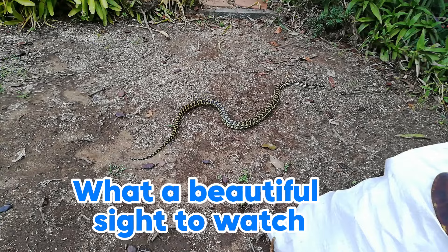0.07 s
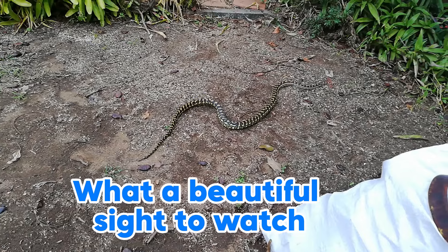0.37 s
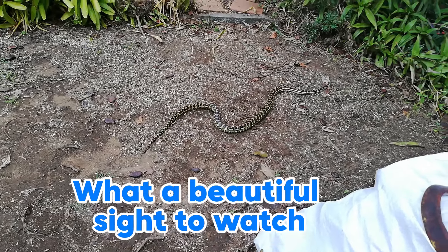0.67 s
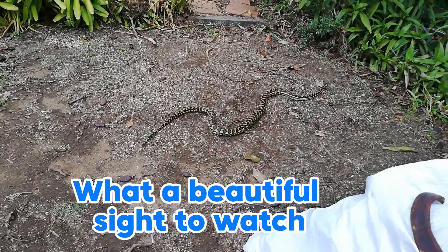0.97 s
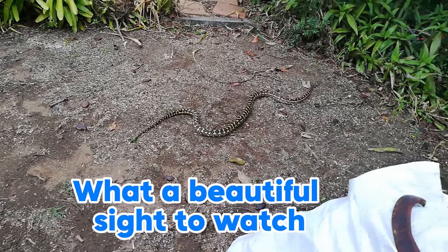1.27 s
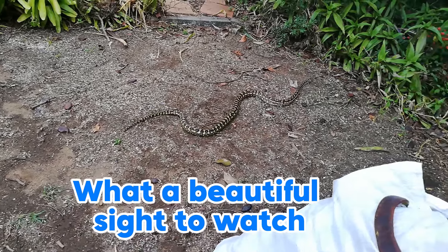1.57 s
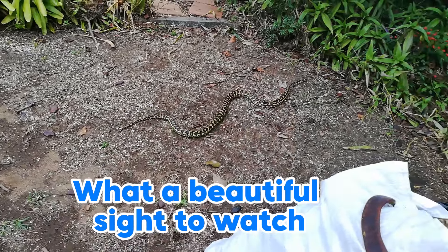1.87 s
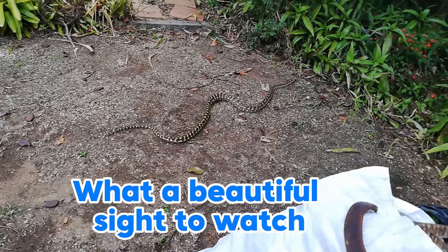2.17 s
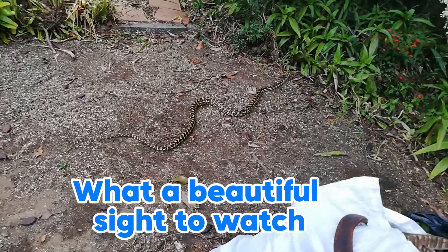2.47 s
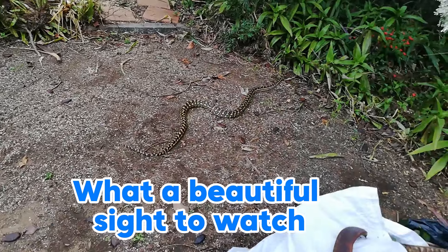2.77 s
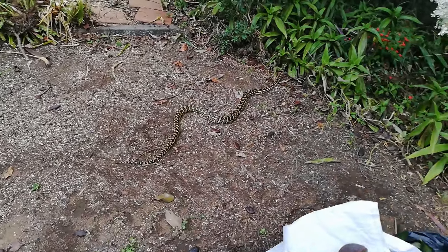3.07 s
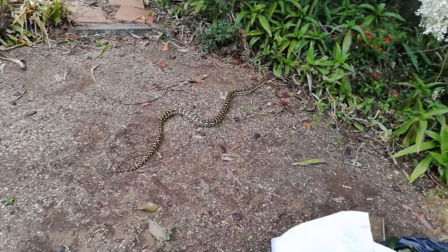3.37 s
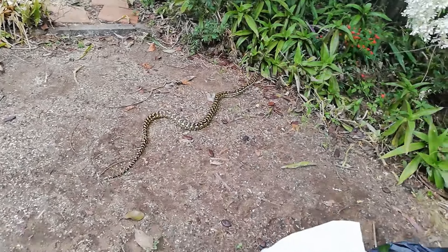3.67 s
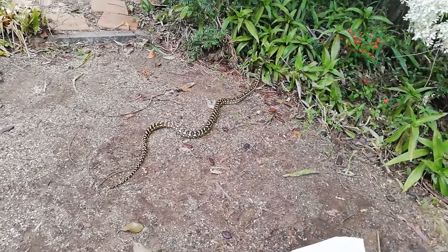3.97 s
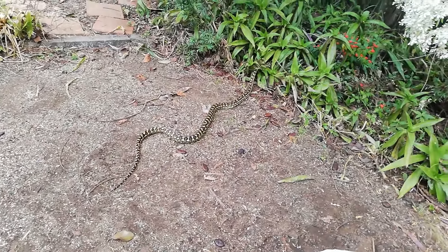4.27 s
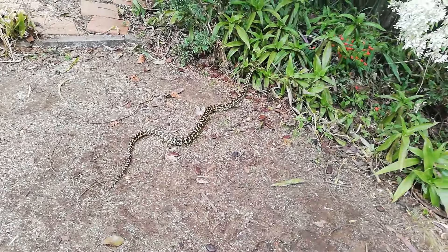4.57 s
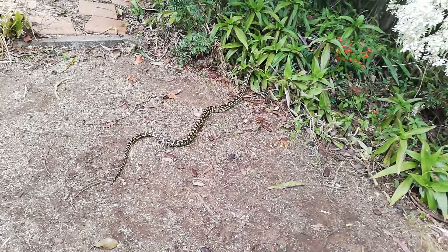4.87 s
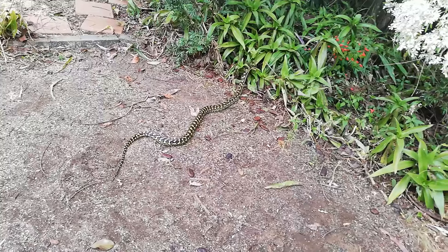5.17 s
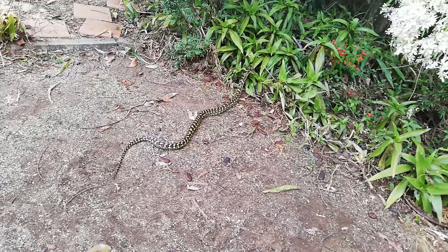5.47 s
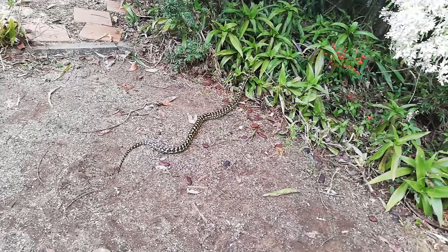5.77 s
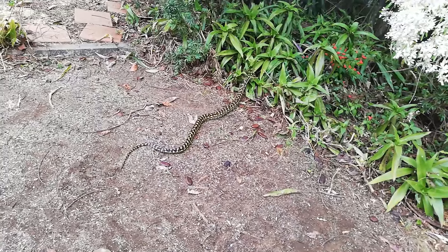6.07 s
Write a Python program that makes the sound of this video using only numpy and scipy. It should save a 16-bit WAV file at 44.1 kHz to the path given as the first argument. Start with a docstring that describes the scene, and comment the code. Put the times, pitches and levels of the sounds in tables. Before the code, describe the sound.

Cicadas fill a suburban garden with a shrill, ringing buzz that pulses slightly and stays loud throughout. Small sharp ticks dot the drone, with one quick cluster of thin squeaks just before halfway. Faint regular chirps follow, and a thin whine enters near the end. The hand-held microphone picks up a few soft thuds and scuffs, while faint far-off traffic and a low hum swell and ease.

```python
"""A cicada chorus drones and surges in backyard trees: tymbal clicks ringing in air sacs,
smeared by foliage. Lower singers join one by one; a thin whine enters late. One insect chirps
in time; a cluster of squeaks and a few sharp ticks come from the garden. Underneath: soft
bumps and rustles on a hand-held microphone, distant traffic, a low rumble and a faint hum."""
import sys
import numpy as np
from scipy import signal
from scipy.fft import rfft, irfft, next_fast_len
from scipy.io import wavfile
from scipy.ndimage import map_coordinates

SR = 44100
rng = np.random.default_rng(int(sys.argv[2]) if len(sys.argv) > 2 else 0)


def transcribe(u):
    """Save the signal u as a 16-bit wav file named by the first command-line argument.

    u: samples, shape (n,) or (channels, n), limited to [-1, 1]; the rate is SR.
    q: integer samples, one column per channel.
    """
    v = np.clip(np.atleast_2d(u).T, -1, 1)
    q = np.round(v * 32767).astype(np.int16)
    wavfile.write(sys.argv[1], SR, q)


N = 274743
T = np.arange(N) / SR


def chorus(level_db=-15.5, overtone_rel_db=-33.2, rasp_rel_db=-26, overtone_throb=.45):
    """Far cicadas blur into a drone; near ones flutter through it, clearest in the overtones."""
    # air sac resonances per side: centre_hz, width_hz, level_db
    left_sacs = [(5060, 260, -23), (5450, 430, -5.6), (5575, 190, -1.2), (5738, 160, 0), (5870, 110, -13)]
    right_sacs = [(5060, 260, -22.5), (5440, 430, -7), (5572, 160, 0), (5735, 135, -.2)]
    # their octave overtones: centre_hz, width_hz, level_db
    overtone_modes = [(10980, 980, -4.5), (11135, 100, -.5), (11420, 330, -5), (11490, 150, 1)]
    # broad tymbal rasp: freq_hz, density_db
    rasp_spectrum = [(3800, -46), (4400, -8.5), (4800, -6), (5300, -1), (6200, -5), (6700, -5.5),
                     (7300, -14.5), (8100, -23), (10000, -14), (12000, -23), (12600, -25), (15300, -19.5)]
    far = unit(sum(garden(tymbal(hz, drift=.007, scatter_s=.00007, rib_gap_s=.0035, ribs=6))
                   for hz in (38.22, 39.26, 40.94, 42.1, 42.92, 44.4)))
    near = np.array([tymbal(hz, drift=.04, scatter_s=.0002, rib_gap_s=.0014, ribs=7) for hz in (41, 39)])
    ringing = amp(2) * even_singers()
    left, right = far + ringing + amp(-3.5) * near
    sides = np.array([resonate(left, left_sacs), resonate(right, right_sacs)])
    drone = steadied(sides) * amp([[-.3], [.4]])
    ahead = tymbal(37.7, drift=.04, scatter_s=.000291, rib_gap_s=.0017, ribs=12)
    overtones = steadied(resonate(ringing + amp(-3) * ahead, overtone_modes)) * pan(-3.4)
    rasp = steadied(filtered(far, lambda hz: amp(along(rasp_spectrum, hz)))) * pan(.8)
    throb_db = surges() + .5 * wobble(10)
    dulling_db = 2 * ramp(centre_s=4.8, length_s=.4)
    overtone_db = overtone_rel_db - dulling_db + overtone_throb * throb_db
    rasp_db = rasp_rel_db + .76 * wobble(13)
    return amp(level_db) * (amp(throb_db) * drone + amp(overtone_db) * overtones + amp(rasp_db) * rasp)


def tymbal(stroke_hz, drift, scatter_s, rib_gap_s, ribs):
    """Each muscle stroke buckles a row of ribs, one click per rib."""
    cycles = rng.random() + np.cumsum(stroke_hz * (1 + drift * wobble(2))) / SR
    strokes_s = np.interp(np.arange(1, int(cycles[-1])), cycles, T)
    rib_delays_s = np.cumsum(rib_gap_s * rng.uniform(.5, 1.5, ribs))
    jitter_s = scatter_s * rng.standard_normal((len(strokes_s), ribs))
    at_samples = SR * (strokes_s[:, None] + rib_delays_s + jitter_s).reshape(-1, 1)
    taps = np.floor(at_samples) + np.arange(-7, 9)
    clicks = amp(rng.normal(0, 1.63, at_samples.shape)) * np.sinc(taps - at_samples)
    indices = np.clip(taps, 0, N).astype(int)
    return unit(np.bincount(indices.ravel(), clicks.ravel(), N + 1)[:N])


def even_singers():
    """Tymbals beating so regularly that their buzz has a ringing pitch."""
    clicks = sum(tymbal(hz, drift=.0026, scatter_s=.00001, rib_gap_s=.003, ribs=2)
                 for hz in (40.6, 42.9, 44.3))
    return unit(garden(clicks))


def surges(half_length_s=.088):
    """Chorus level per side, dB about its mean: roughly three surges a second."""
    # surges: centre_s, height_db, side (-1 left, 1 right)
    peaks = [(.32, 2.8, 1), (.46, 2.4, -1), (.54, 3, 1), (.68, 1.5, -1), (.88, 2.3, 1), (.92, 2.5, -1),
             (1.15, 3.2, 1), (1.18, 3, -1), (1.34, 2.6, 1), (1.44, 1.8, -1), (1.56, 2, 1), (1.61, 1.4, -1),
             (1.7, 1.9, 1), (1.95, 3.8, 1), (1.96, 2, -1), (2.26, 1.8, -1), (2.3, 3.3, 1), (2.5, 3.8, 1),
             (2.56, 1.1, -1), (2.85, 3.5, 1), (3, 1.4, -1), (3.05, 3, 1), (3.17, 2.8, 1), (3.3, 1.8, -1),
             (3.36, 2.1, 1), (3.57, 2.8, 1), (3.58, 1.6, -1), (3.85, 2.3, 1), (3.97, 1.8, -1),
             (4.16, 4.3, 1), (4.2, 2.6, -1), (4.41, 1.8, -1), (4.47, 4, 1), (4.57, 2.2, -1), (4.74, 2.5, 1),
             (4.8, 2.3, -1), (4.96, 2.1, 1), (5.03, 1.3, -1), (5.2, 2.2, 1), (5.45, 3.8, 1),
             (5.54, 1.4, -1), (5.73, 3.8, 1), (5.8, 3, -1), (5.96, 3.8, 1), (6.04, 2.4, -1), (6.22, 3.7, 1)]
    level_db = np.zeros((2, N))
    for centre_s, height_db, side in peaks:
        level_db[int(side > 0)] += height_db * bell(T - centre_s, half_length_s)
    return level_db - level_db.mean(axis=1, keepdims=True)


def steadied(x, window_s=.12, strength=.62):
    """Evens each side's loudness, as singers and echoes fill each other's gaps."""
    window = np.hanning(round(window_s * SR))
    power = signal.fftconvolve(x ** 2, window[None] / window.sum(), "same", axes=1)
    return unit(x / np.abs(power) ** (strength / 2))


def garden(x):
    """Leaves and walls scatter a sound into a different tail per side."""
    # echo decay: freq_hz, t60_s
    decay = [(4000, 0.79), (9000, 0.35), (15000, 0.98)]
    hz, t, noise = signal.stft(rng.standard_normal((2, SR // 2)), SR, nperseg=256)
    tail = signal.istft(noise * amp(-60 * t / along(decay, hz)[:, None]), SR, nperseg=256)[1]
    return signal.fftconvolve(x[None], tail / np.linalg.norm(tail[0]), axes=1)[:, :N]


def lower_singers(rise_s=.13, push_db=4, settle_s=.2):
    """Lower cicadas enter in turn with a push, settle and keep singing."""
    # singers: entry_s, level_db, pitch_hz, width_hz, pan_db
    entries = [(0, -55, 4640, 300, 2), (.33, -50.5, 4400, 105, 2), (1.97, -51, 4425, 125, 3),
               (2.9, -43, 4455, 145, 4), (3.03, -45, 4995, 130, -5), (3.48, -44, 4650, 380, 4),
               (4.24, -43.5, 4420, 80, 6), (4.36, -41, 5080, 160, -4), (4.8, -43.5, 4620, 360, 4)]
    out = np.zeros((2, N))
    for entry_s, level_db, pitch_hz, width_hz, pan_db in entries:
        clicks = tymbal(rng.uniform(40, 45), drift=.016, scatter_s=.0001, rib_gap_s=.002, ribs=5)
        song = steadied(resonate(garden(clicks) + amp(-7) * clicks, [(pitch_hz, width_hz, 0)]))
        joining = ramp(entry_s, rise_s) * amp(push_db * np.exp(-since(entry_s) / settle_s))
        out += amp(level_db + wobble(4)) * joining * song * pan(pan_db)
    return out


def late_singer(pitch_hz=4080, stroke_hz=44.85, width_hz=52, jitter_hz=10, sag_hz_per_s=110, edge_s=.035):
    """Thin whine, right: a sinking resonance picks out a few overtones of the muscle strokes."""
    # phrases, soft-loud-soft: start_s, end_s, level_db
    phrases = [(3.78, 5.52, -60), (5.52, 5.675, -47), (5.705, 5.89, -45.5), (5.89, 6.05, -47),
               (6.05, 6.4, -53.5)]
    envelope = sum(amp(level_db) * ramp(start_s, edge_s) * (1 - ramp(end_s, edge_s))
                   for start_s, end_s, level_db in phrases)
    centre_hz = pitch_hz - sag_hz_per_s * since(5.55)
    stroke_rad = phase(stroke_hz * (1 + jitter_hz / pitch_hz * wobble(30)))
    harmonics = round(pitch_hz / stroke_hz) + np.arange(-4, 4)
    buzz = sum(np.sin(k * stroke_rad + 2 * np.pi * rng.random()) * bell(k * stroke_hz - centre_hz, width_hz)
               for k in harmonics)
    whine = envelope * amp(1.2 * wobble(15)) * unit(buzz)
    return (whine + amp(-5) * garden(whine)) * amp([[-4], [1]])


def chirper(first_s=2.9, period_s=.358, half_length_s=.021, level_db=-42.5, count=9):
    """One insect's short, high, evenly spaced rasps."""
    envelope = sum(bell(T - centre_s, half_length_s) for centre_s in first_s + period_s * np.arange(count))
    clicks = tymbal(200, drift=.017, scatter_s=.00029, rib_gap_s=.00101, ribs=2)
    return amp(level_db) * envelope * resonate(garden(clicks), [(6640, 190, 0)])


def squeaks(hoarseness=.0228, echo_db=-14):
    """A quick cluster of thin, hoarse gliding notes."""
    # notes: centre_s, length_s, start_hz, end_hz, level_db
    glides = [(2.582, .024, 6080, 5960, -26), (2.585, .022, 5120, 4780, -23.5),
              (2.608, .016, 4780, 4720, -30), (2.617, .038, 6030, 6080, -27)]
    notes = np.zeros(N)
    for centre_s, length_s, start_hz, end_hz, level_db in glides:
        progress = np.clip((T - centre_s) / length_s + .5, 0, 1)
        pitch_hz = (start_hz + (end_hz - start_hz) * progress) * (1 + hoarseness * wobble(700))
        notes += amp(level_db) * np.sin(np.pi * progress) * np.sin(phase(pitch_hz))
    return notes + amp(echo_db) * garden(notes)


def ticks(width_hz=1500, gain_db=-4.5, faint_count=8):
    """Dry snaps, each with a short crumble; farther ones trail off as diffuse hiss."""
    # sharp ticks: start_s, level_db, centre_hz, pan_db, echo_db
    sharp = [(0.5755, -34, 7950, 0, -17), (1.1393, -26, 6700, -15, -38), (1.1442, -26.5, 6800, -13, -34),
             (2.0223, -24, 8900, 11, -15.5), (2.0291, -31, 8900, 9, -15), (2.557, -26, 7050, -11, -29),
             (2.5605, -26.5, 7100, -15, -33), (3.7808, -28, 9200, -9, -15), (3.789, -39, 9000, 4, -16),
             (3.864, -30, 8800, -11, -16), (4.8633, -26.5, 7050, 12, -16), (4.8744, -27.5, 6950, 12, -30),
             (4.8773, -25, 7240, 10, -38), (5.2208, -33, 7000, 14, -29), (6.1693, -27.5, 8000, 11, -26),
             (6.172, -29, 8000, 7, -24)]
    # faint tick, randomly timed: level_db, centre_hz, pan_db, echo_db
    faint_tick = (-43, 8299, -2, -23)
    # brittle opening crack: freq_hz, density_db
    crack_spectrum = [(3500, -27), (6500, 5.5), (10000, -4), (12000, -18), (15000, -22)]
    out = np.zeros((2, N + SR))
    t = np.arange(SR // 2) / SR
    hz = np.fft.rfftfreq(len(t), 1 / SR)
    decay = lambda start_db, t60_s: amp(start_db - 60 * t / t60_s)
    noise = lambda shape, response: unit(irfft(rfft(rng.standard_normal(shape)) * response, len(t)))
    faint = [(start_s, *faint_tick) for start_s in rng.uniform(0, T[-1], faint_count)]
    for start_s, level_db, centre_hz, pan_db, echo_db in sharp + faint:
        hiss = noise((3, len(t)), 1 / (1 + ((hz - centre_hz) / width_hz) ** 2))
        snap = decay(0, t60_s=.005) * np.sin(2 * np.pi * centre_hz * t)
        crumble = decay(-18, t60_s=.055) * hiss[0]
        crack = decay(-3, t60_s=.006) * noise(len(t), amp(along(crack_spectrum, hz)))
        echo = decay(echo_db, t60_s=.7) * hiss[1:]
        tick = (snap + crumble + crack) * pan(pan_db) + echo
        onset = round(start_s * SR)
        out[:, onset:onset + len(t)] += amp(level_db + gain_db) * tick
    return out[:, :N]


def bumps(grit_db=-12):
    """Soft, dull thuds as the microphone is moved."""
    # thuds: start_s, peak_db, rise_s, pitch_hz
    thuds = [(.487, -31, .013, 66), (2.152, -33, .008, 88), (2.21, -39, .008, 90), (3.025, -33, .008, 75),
             (3.115, -35, .008, 65), (3.238, -42, .008, 190), (4.178, -29.5, .007, 60),
             (4.322, -35.5, .016, 70), (4.38, -28.5, .013, 62)]
    out = np.zeros((2, N))
    grit = amp(grit_db) * rush([(15, -2), (40, 2), (80, -4), (130, 3), (220, -3), (500, -42)])
    for start_s, peak_db, rise_s, pitch_hz in thuds:
        t = since(start_s)
        envelope = amp(peak_db) * t / rise_s * np.exp(1 - t / rise_s)
        out += envelope * (np.sin(2 * np.pi * pitch_hz * t) + grit)
    return out


def rustles():
    """Brief scuffs of the moving microphone: a swish over a low body."""
    # scuffs: centre_s, level_db, half_length_s, body_rel_db
    scuffs = [(3.785, -46.5, .02, -6), (3.838, -51, .018, 3), (3.87, -52, .025, -3), (4.535, -54, .025, -2),
              (4.94, -55, .03, -5)]
    swish = rush([(650, -11), (1500, -8), (3600, 4), (9000, -35), (15000, -32)])
    body = rush([(100, -12), (220, 5), (650, -4), (1200, -18), (4000, -45)])
    return sum(amp(level_db) * bell(T - centre_s, half_length_s) * (swish + amp(body_rel_db) * body)
               for centre_s, level_db, half_length_s, body_rel_db in scuffs)


def traffic(closest_s=3.69, half_power_s=1.48, pass_db=-43.5, steady_db=-52.5,
            rumble_db=-45.5, hum_db=-50.2, hum_hz=104.6):
    """Far traffic nears and recedes; a low rumble and a wavering hum swell with it."""
    # traffic rush and low rumble: freq_hz, density_db
    rush_spectrum = [(80, -21), (220, -2.5), (400, -4.5), (700, -3), (1200, -6), (2000, -9.5),
                     (3300, -11.5), (5000, -7), (9000, -26.5), (16000, -42)]
    rumble_spectrum = [(15, -2.5), (30, 2.5), (62, -1.5), (100, -3.5), (160, -9.5), (260, -19.5),
                       (500, -49)]
    nearness = 1 / (1 + ((T - closest_s) / half_power_s) ** 2)
    level = np.sqrt(amp(steady_db) ** 2 + amp(pass_db) ** 2 * nearness)
    swell = level / level.max()
    hum_gain = amp(hum_db + 1.3 * wobble(2.86)) * swell ** 1.1
    hum = hum_gain * np.sin(phase(hum_hz + 1.41 * wobble(4.5)))
    road = level * rush(rush_spectrum)
    rumble = amp(rumble_db) * swell ** .46 * rush(rumble_spectrum)
    return road + rumble + hum


def rush(spectrum):
    """Stereo noise from (freq_hz, density_db) points; rms 1, sides alike in the bass."""
    # left-right likeness: freq_hz, correlation
    likeness = [(60, 0.64), (150, 0.93), (330, 0.52), (500, -0.079), (770, -0.4), (1200, 0.058),
                (4000, -0.023)]

    def response(hz):
        spread_rad = np.arccos(np.clip(along(likeness, hz), -1, 1)) / 2
        return amp(along(spectrum, hz)) * [np.cos(spread_rad), np.sin(spread_rad)]

    mid, side = filtered(rng.standard_normal((2, N)), response)
    return unit(np.array([mid + side, mid - side]))


def resonate(x, modes):
    """x through steep-sided resonances (centre_hz, width_hz, level_db); rms 1."""
    power = lambda hz: sum(amp(level_db) ** 2 / (1 + 2 * ((hz - centre_hz) / width_hz) ** 2) ** 4
                           for centre_hz, width_hz, level_db in modes)
    return unit(filtered(x, lambda hz: np.sqrt(power(hz))))


def filtered(x, response):
    """x through the gain curve response(hz)."""
    size = next_fast_len(N + SR // 4)
    return irfft(rfft(x, size) * response(np.fft.rfftfreq(size, 1 / SR)), size)[..., :N]


def along(points, hz):
    """Interpolates (freq_hz, value) points on a log axis."""
    freq_hz, values = np.transpose(points)
    return np.interp(np.log(hz + 1), np.log(freq_hz + 1), values)


def wobble(knots_per_s):
    """Smooth random curve."""
    return map_coordinates(rng.standard_normal(int(N * knots_per_s / SR) + 4), [T * knots_per_s])


def ramp(centre_s, length_s):
    """Smooth step, 0 to 1."""
    return .5 + .5 * np.sin(np.pi * np.clip((T - centre_s) / length_s, -.5, .5))


def bell(offset, half_width):
    """Gaussian, 1/e at half_width."""
    return np.exp(-(offset / half_width) ** 2)


def since(start_s):
    """Seconds elapsed, 0 before the start."""
    return np.maximum(T - start_s, 0)


def phase(hz):
    """Running phase, rad."""
    return 2 * np.pi * np.cumsum(hz) / SR


def pan(pan_db):
    """Stereo gains, left over right by pan_db."""
    return amp([[pan_db / 2], [-pan_db / 2]])


def amp(db):
    """dB to gain."""
    return 10 ** (np.asarray(db) / 20)


def unit(x):
    """Scales to rms 1."""
    return x / np.sqrt(np.mean(x ** 2) + 1e-20)


def scene():
    """Insects over the quiet yard."""
    insects = chorus() + lower_singers() + late_singer() + chirper()
    return insects + squeaks() + ticks() + traffic() + bumps() + rustles()


def record(dry, fade_start_s=.044, fade_rise_s=.128, floor_db=-63, top_hz=15500):
    """Input fade-in, then a hard band limit."""
    fade = 1 - np.exp(-since(fade_start_s) / fade_rise_s)
    return filtered(dry * np.maximum(fade, amp(floor_db)), lambda hz: hz < top_hz)


dry = scene()
out = record(dry)
transcribe(out)
```